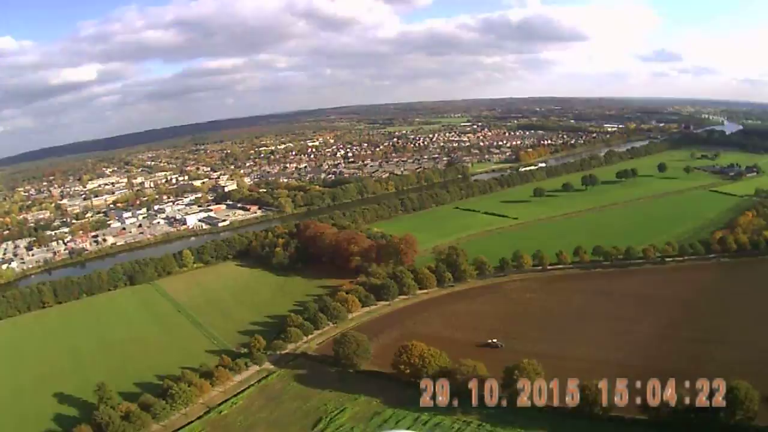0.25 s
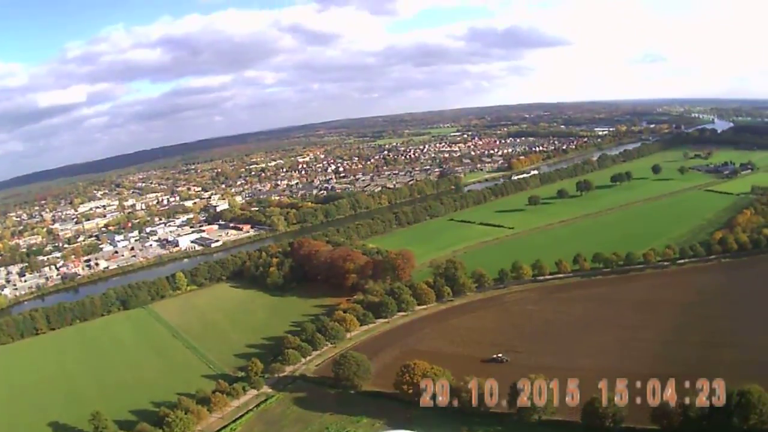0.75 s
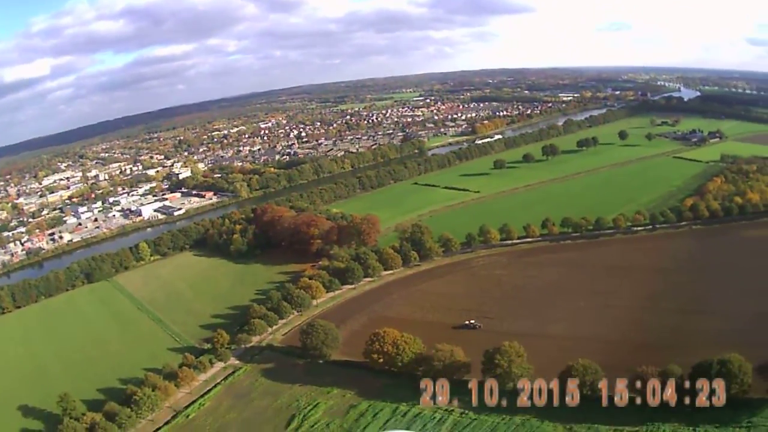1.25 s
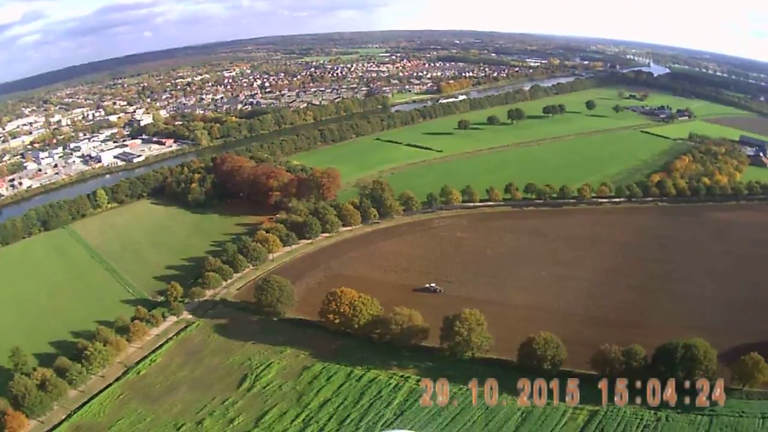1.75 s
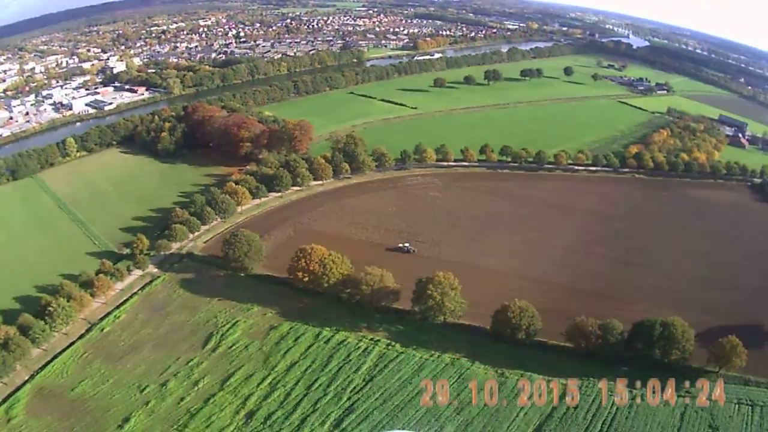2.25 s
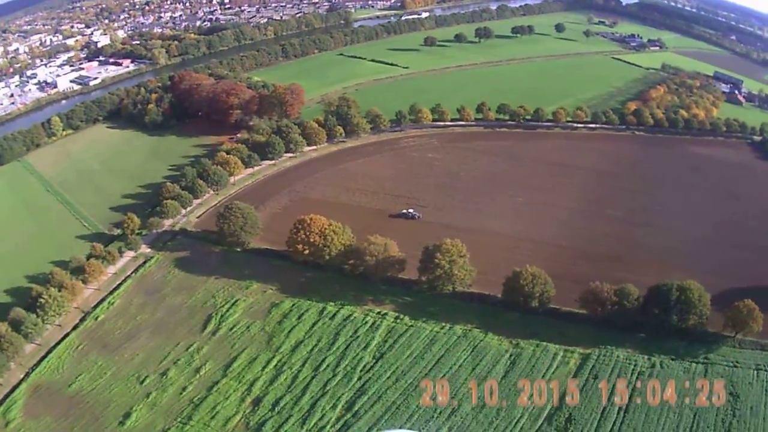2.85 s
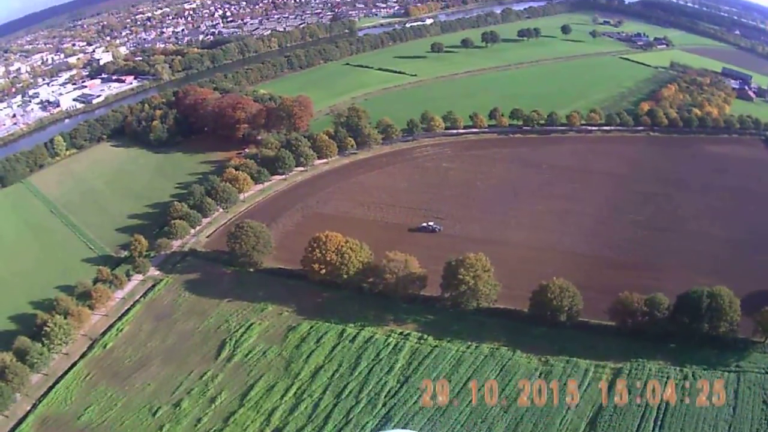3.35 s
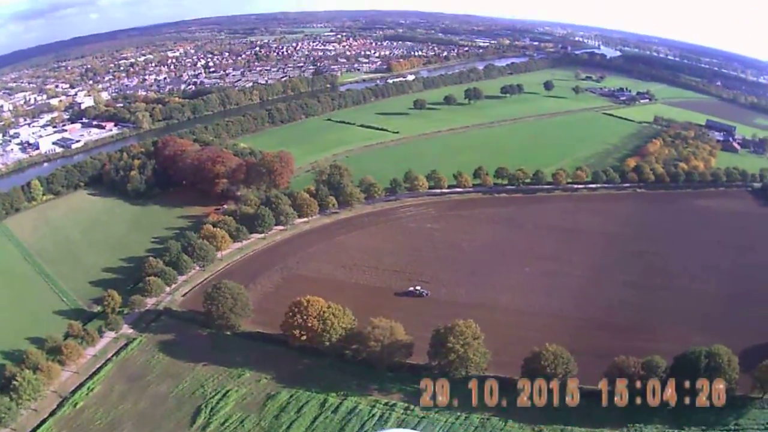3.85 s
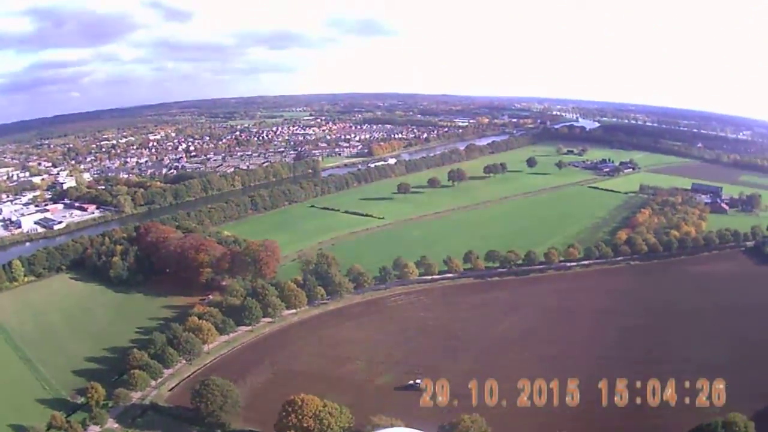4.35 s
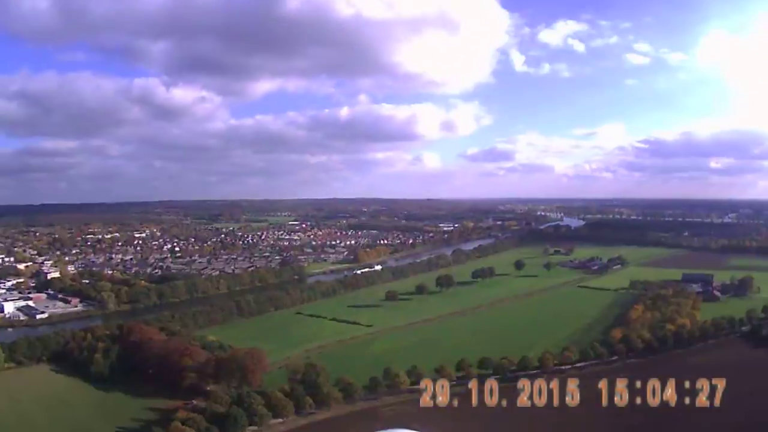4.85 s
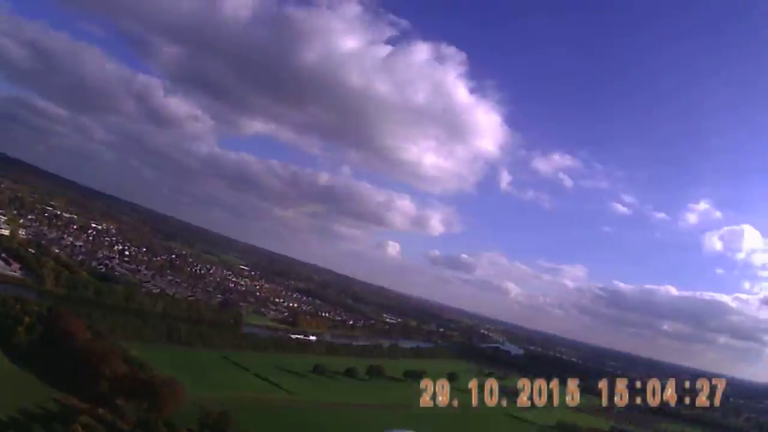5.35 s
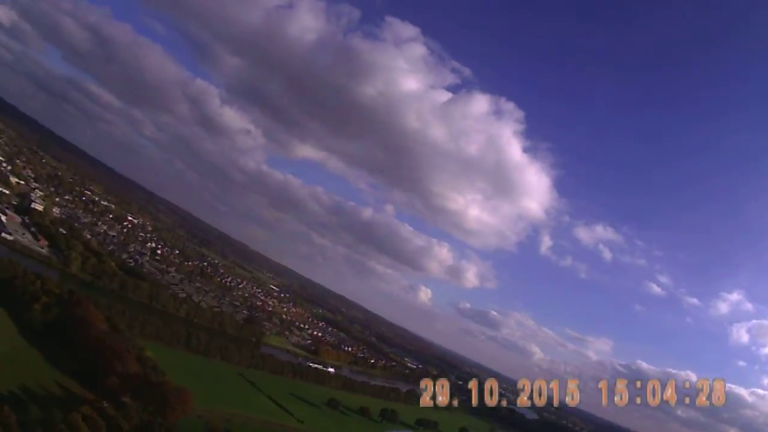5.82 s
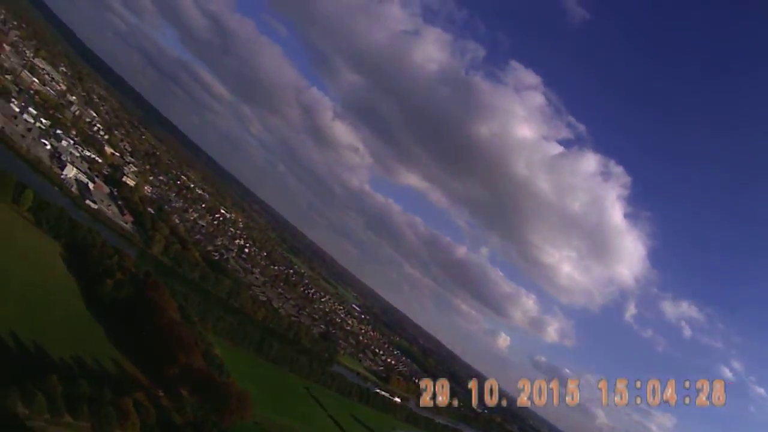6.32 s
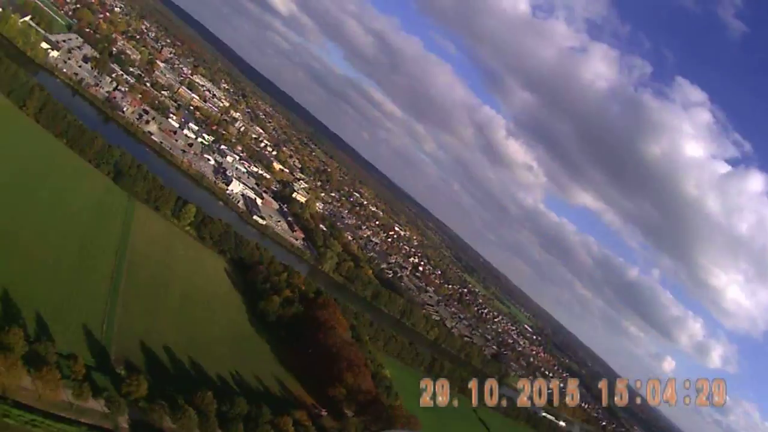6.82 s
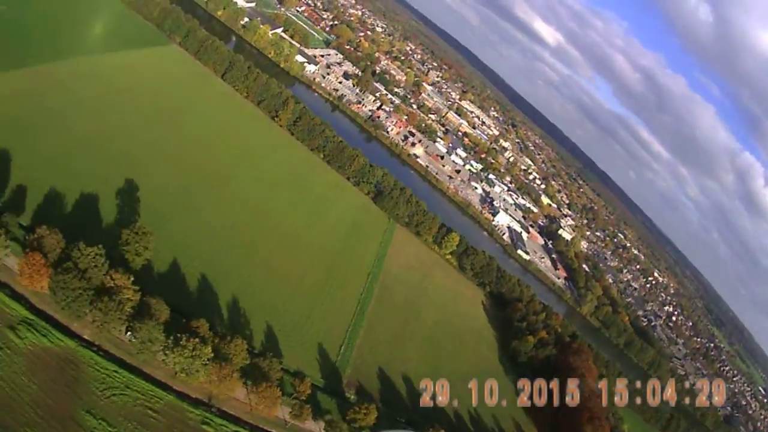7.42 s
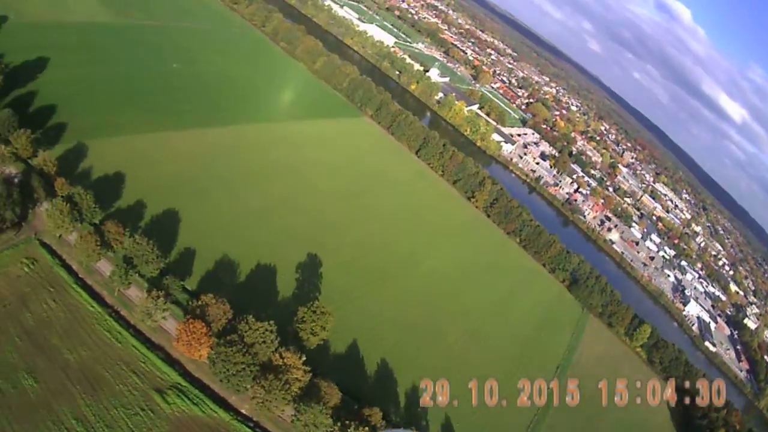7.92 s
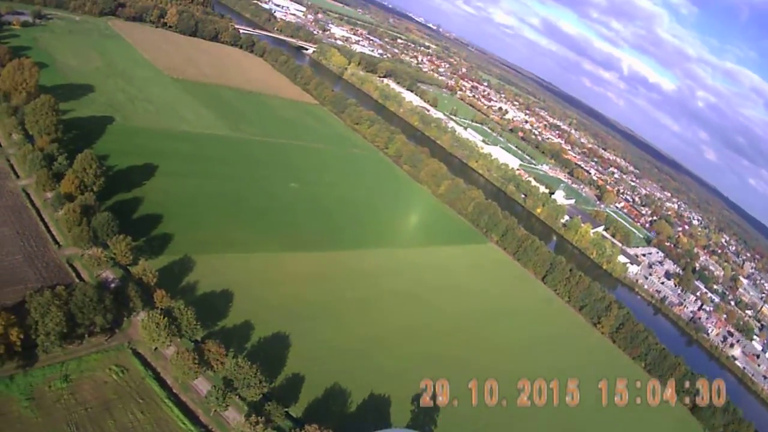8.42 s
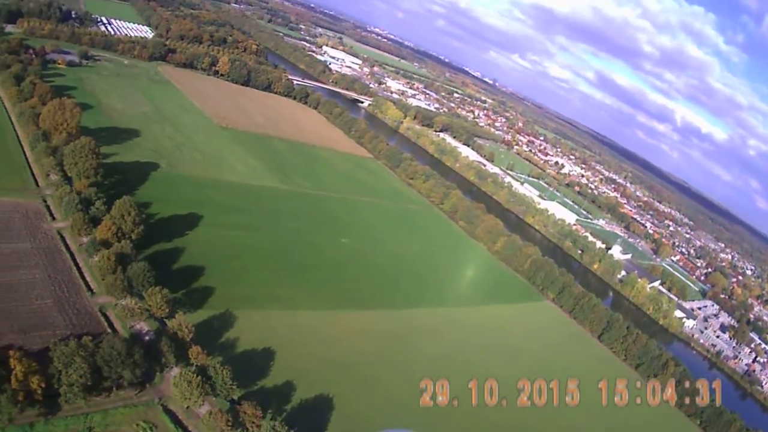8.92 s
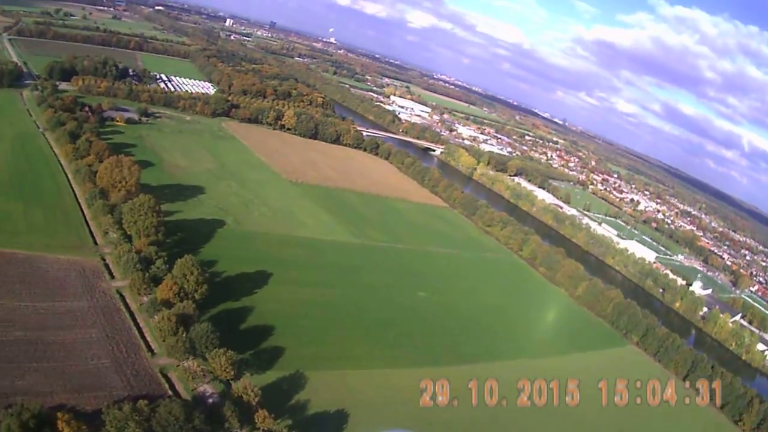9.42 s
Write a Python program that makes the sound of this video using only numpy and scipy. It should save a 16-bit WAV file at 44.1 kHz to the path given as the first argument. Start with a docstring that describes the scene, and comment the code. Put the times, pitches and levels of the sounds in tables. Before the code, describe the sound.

Loud, muffled wind buffets a small camera on a gliding model aircraft, swelling to a crackling roar, dropping to a softer hiss, then building again.

```python
"""Wind rushes over a small camera on a model glider that dives, pulls up into a slow bank and gathers speed again.
Filtered noise makes each layer: eddies buffet the microphone port over a low rumble, the airflow hisses
through the hollows of the case, and a few brief scuffs rub the airframe. One airspeed curve drives the wind.
The narrow-band recorder overloads at the fastest part of the dive and crackles on the strongest gusts."""
import sys
import numpy as np
from scipy import signal
from scipy.fft import rfft, irfft
from scipy.io import wavfile
from scipy.ndimage import uniform_filter1d, map_coordinates

SR = 44100
rng = np.random.default_rng(int(sys.argv[2]) if len(sys.argv) > 2 else 0)


def persist_wave(psi):
    """Save psi, clipped to +-1, as 16-bit WAV."""
    counts = np.round(np.clip(psi, -1, 1) * 32767).astype(np.int16)
    wavfile.write(sys.argv[1], SR, np.atleast_2d(counts).T)


N = 426888
TIME, HZ = np.arange(N) / SR, np.fft.rfftfreq(N, 1 / SR)

# airspeed as a relative level of the rush, through glide, dive, slow bank and new descent: t/s, level/dB
AIRSPEED = [(0.0, -23.5), (1.0, -25.0), (1.8, -24.5), (2.8, -21.5), (3.35, -18), (4.6, -17), (5.05, -19.5),
            (5.55, -22), (6.15, -25.5), (6.8, -27), (7.55, -27), (8.1, -24.5), (8.5, -22.5), (8.95, -23.0),
            (9.2, -22.5), (9.68, -22.5)]
# shelter of the port from the eddies as the glider pulls up and banks: t/s, loss of buffeting/dB
PORT_SHELTER = [(0.0, 1.4), (1.8, 1.3), (2.3, 0.5), (3.3, -0.3), (4.2, -0.5), (5.19, 0.9), (5.38, 9),
                (5.95, 6), (6.55, 10), (7.52, 7), (7.92, 3), (8.7, -0.7), (9.05, 1.5), (9.38, 9.5),
                (9.56, 0.5), (9.68, -5)]
# gusts: t/s, length/s, lift of the buffeting/dB, lift of the hiss/dB
WIND_GUSTS = [(0.69, 0.085, 4.5, 4.5), (1.237, .14, 4, 2.5), (1.532, 0.048, 6.5, 0), (2.055, 0.11, 2, 2),
              (2.464, .08, 3, 2), (3.15, .2, 0.5, 1), (7.304, 0.09, 3, 0), (8.03, 0.082, 3.5, 0)]
CRUISE_DB = -24  # airspeed level of a steady glide


def gain_of(db):
    """Decibels to amplitude."""
    return 10 ** (np.asarray(db) / 20)


def evened(x):
    """Scales to rms 1."""
    return x / np.sqrt(np.mean(x ** 2) + 1e-20)


def follow(rows):
    """Joins timed points by straight lines into a curve at every sample."""
    return np.interp(TIME, *np.transpose(rows))


def spectrum_at(points):
    """Joins spectrum points along a log frequency axis, in dB at every frequency."""
    hz, db = np.transpose(points)
    return np.interp(np.log(HZ + 1), np.log(hz + 1), db)


def swell(center_s, length_s):
    """A smooth rise and fall of height 1 around a moment; the length is its width at 1/e of the height."""
    return np.exp(-(2 * (TIME - center_s) / length_s) ** 2)


def excess_db():
    """How far the airflow is above that of a steady glide."""
    return follow(AIRSPEED) - CRUISE_DB


def turbulence(spectrum_db):
    """Random pressure of rms 1: white noise shaped to the given spectrum."""
    white = rng.standard_normal(N)
    return evened(irfft(rfft(white) * gain_of(spectrum_db), N))


def flutter(rate_hz):
    """Random swings of rms 1, from a fifth of the given rate up to it, fading above."""
    white = rng.standard_normal(N)
    band = (HZ > rate_hz / 5) / (1 + (HZ / rate_hz) ** 4)
    return evened(irfft(rfft(white) * band, N))


def steadied(x, span_s):
    """Takes the slow drift out of a noise, so that its level curve alone sets the swell."""
    size = max(int(span_s * SR), 2)
    power = uniform_filter1d(uniform_filter1d(x ** 2, size), size)
    return x / np.sqrt(power + 1e-9)


def carried(x, pace):
    """Plays a frozen field of eddies at a varying pace: faster air, higher roar."""
    position = np.cumsum(pace) % N
    return map_coordinates(x, [position], order=1, mode="wrap")


def case_db():
    """Broad resonances of the hollows in front of the microphone."""
    # hollows of the case: f/Hz, width/Hz, boost/dB
    hollows = [(1840, 240, 2.5), (2270, 250, 2)]
    return sum(db / (1 + (2 * (HZ - hz) / width) ** 2) for hz, width, db in hollows)


def rumble(cruise_level_db=-24.5, growth=0.33, wake_share=0.23, wander_db=1.0):
    """Large, slow eddies press on the whole camera, harder at speed and when the port lies in the wake."""
    # colour of the rumble: f/Hz, density/dB (relative)
    rumble_spectrum = [(10, -34.5), (22, -22), (33, -11.5), (45, -7), (65, 0), (100, 0), (150, -2.5),
                       (250, -13.5), (600, -37)]
    # big eddies that thump the whole camera: t/s, length/s, lift of the rumble/dB
    camera_thumps = [(2.15, 0.063, 9), (3.97, 0.28, 3.5), (4.31, .15, 7), (5.132, .12, 7.5),
                     (5.49, 0.23, 5), (7.8, 0.16, 5.5), (8.124, 0.14, 1.5), (9.15, 0.39, 5.5),
                     (9.47, 0.15, 7.5)]
    thump_db = sum(db * swell(s, length) for s, length, db in camera_thumps)
    speed_lift_db = growth * excess_db()  # dB per dB of airflow
    wake_lift_db = wake_share * follow(PORT_SHELTER)  # dB per dB of shelter
    level_db = cruise_level_db + speed_lift_db + wake_lift_db + thump_db
    eddies = steadied(turbulence(spectrum_at(rumble_spectrum)), span_s=0.15)
    return eddies * gain_of(level_db + wander_db * flutter(rate_hz=4.5))


def buffet(cruise_level_db=-13, growth=0.96, pitch_rise=0.17, gusty_db=0.75, lumpy_db=1.18):
    """Small eddies hit the port in lumps and gusts, and rise in level and pitch with the airspeed."""
    # colour of the buffeting before the pace shifts it: f/Hz, density/dB (relative)
    buffet_spectrum = [(50, -27.5), (100, -8), (160, -2), (270, 0), (365, -1), (465, -4), (610, -10),
                       (850, -19), (1300, -33.5), (3000, -47)]
    speed_db = excess_db()
    gust_db = sum(db * swell(s, length) for s, length, db, _ in WIND_GUSTS)
    level_db = cruise_level_db + growth * speed_db - follow(PORT_SHELTER) + gust_db
    pace = gain_of(pitch_rise * (speed_db - speed_db.mean()))
    eddies = steadied(carried(turbulence(spectrum_at(buffet_spectrum)), pace), span_s=0.13)
    slow_gusts_db = gusty_db * flutter(rate_hz=9)
    lumps_db = lumpy_db * flutter(rate_hz=30)
    return eddies * gain_of(level_db + slow_gusts_db + lumps_db)


def airflow(rush_db=4, hiss_db=-32, hiss_growth=1.41, gust_share=0.35, surge_db=2.0, flicker_db=0.22):
    """The boundary layer rushes and hisses through the case, flickering together; hiss grows faster with speed."""
    # colour of the rush: f/Hz, density/dB (relative)
    rush_spectrum = [(60, -3), (200, 6), (500, 5.5), (750, 5.5), (1000, 2.5), (1300, 0.5), (1600, -1),
                     (2100, -4), (2450, -4), (2750, -12), (4000, -18.5), (5000, -48.5)]
    # colour of the hiss: f/Hz, density/dB (relative)
    hiss_spectrum = [(1200, -23.5), (2200, -6), (2700, -2.5), (3000, -3), (3500, -2), (3830, -0.2),
                     (4000, 0.5), (4250, -3.5), (4800, -23.5)]
    speed_db = follow(AIRSPEED)
    gust_db = sum(db * swell(s, length) for s, length, _, db in WIND_GUSTS)
    rush_level_db = speed_db + rush_db + gust_share * gust_db
    rush = turbulence(spectrum_at(rush_spectrum) + case_db()) * gain_of(rush_level_db)
    hiss_level_db = hiss_db + hiss_growth * excess_db() + gust_db
    hiss = turbulence(spectrum_at(hiss_spectrum) + case_db()) * gain_of(hiss_level_db)
    surge = gain_of(speed_db - speed_db.max()) ** 2  # 1 at top speed: an extra push there
    return (rush + hiss) * gain_of(surge_db * surge + flicker_db * flutter(rate_hz=56))


def scuffs(width_hz=800):
    """Short, bright rubs carried through the airframe: noise in a broad peak."""
    # scuffs of the airframe: t/s, level/dB, f/Hz, length/s
    airframe_scuffs = [(0.143, -23, 3000, 0.018), (0.17, -35, 3600, 0.04), (6.325, -30.5, 3300, 0.045)]
    out = np.zeros(N)
    for s, db, hz, length in airframe_scuffs:
        rub = turbulence(-20 * np.log10(1 + ((HZ - hz) / width_hz) ** 2))
        out += rub * gain_of(db) * swell(s, length)
    return out


def scene():
    """All the pressure at the one microphone."""
    return (rumble() + buffet() + airflow() + scuffs())[None]


def low_pass(x, hz, size):
    """Steep low-pass without delay."""
    taps = signal.firwin(size, hz, window=("kaiser", 8), fs=SR)
    return signal.oaconvolve(x, taps[None], "same")


def record(dry, input_limit=0.72, knee=36, output_limit=0.708):
    """An 8 kHz converter overloads; its flat tops ripple once smoothed, and are cut again: a thin crackle."""
    down, up = 80, 441  # 44.1 kHz to 8 kHz and back
    half_rate = signal.firwin(up * 30 + 1, 1 / up, window=("kaiser", 9))
    coarse = signal.resample_poly(dry, down, up, axis=1, window=half_rate)
    saturated = coarse / (1 + abs(coarse / input_limit) ** knee) ** (1 / knee)  # high knee: abrupt limit
    smooth = signal.resample_poly(saturated, up, down, axis=1, window=half_rate)[:, :N]
    clipped = np.clip(smooth, -output_limit, output_limit)
    return low_pass(clipped, hz=15900, size=511)


dry = scene()
out = record(dry)
persist_wave(out)
```